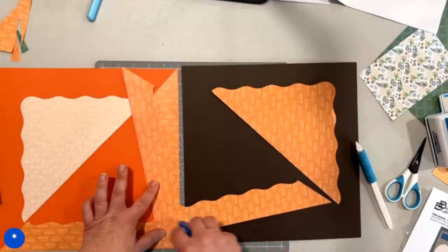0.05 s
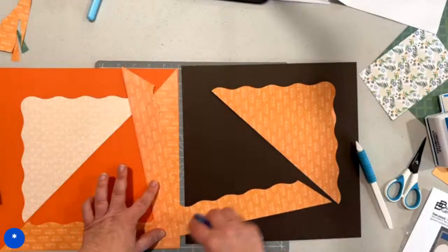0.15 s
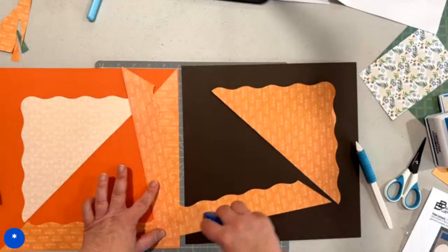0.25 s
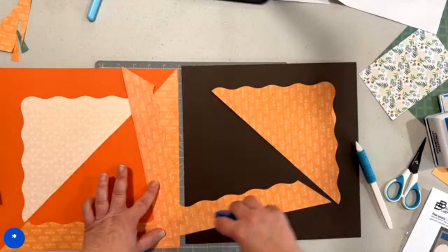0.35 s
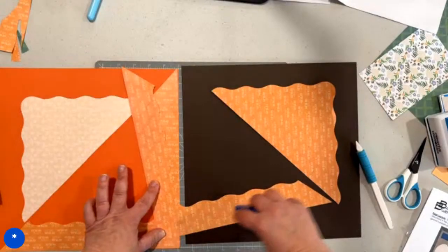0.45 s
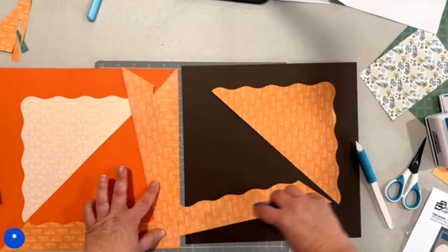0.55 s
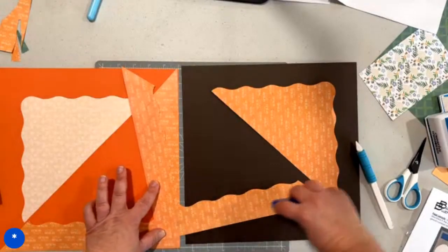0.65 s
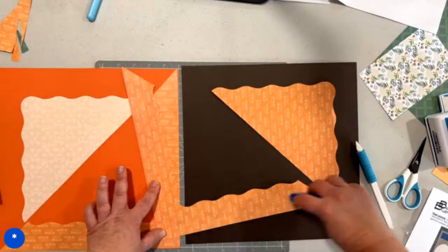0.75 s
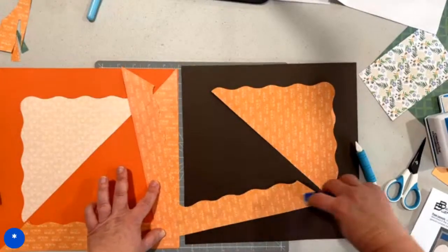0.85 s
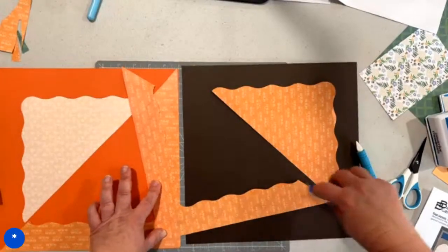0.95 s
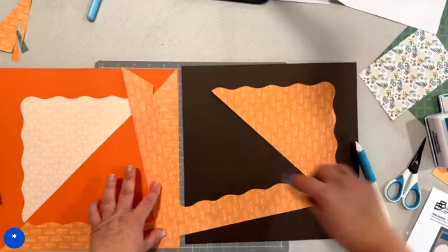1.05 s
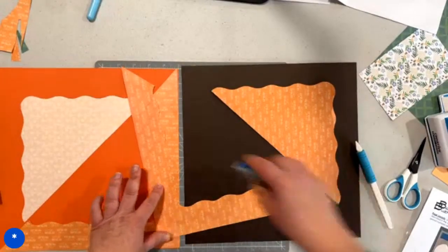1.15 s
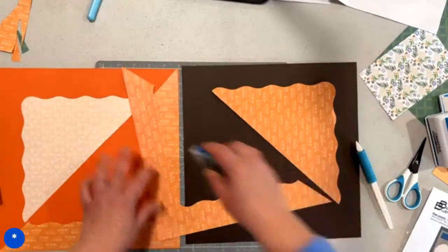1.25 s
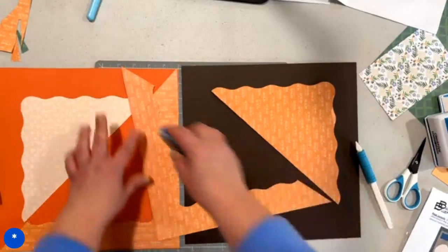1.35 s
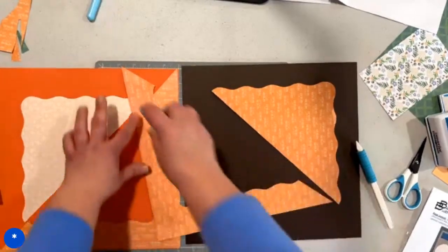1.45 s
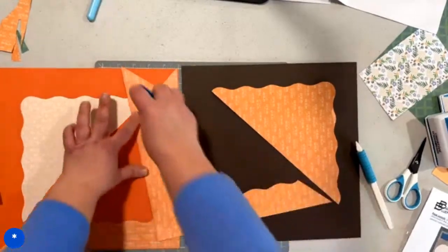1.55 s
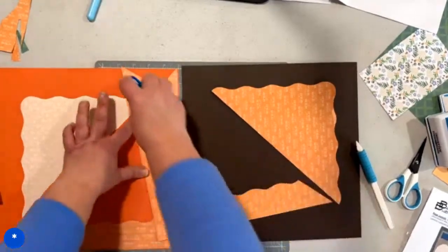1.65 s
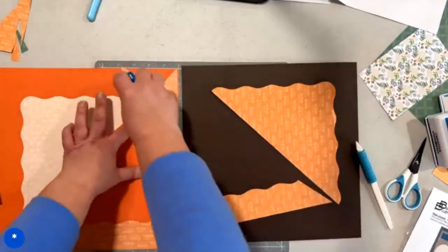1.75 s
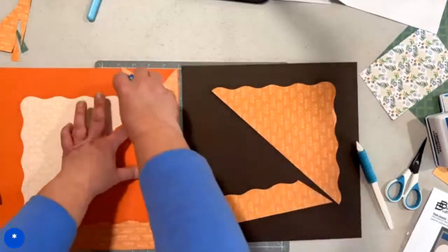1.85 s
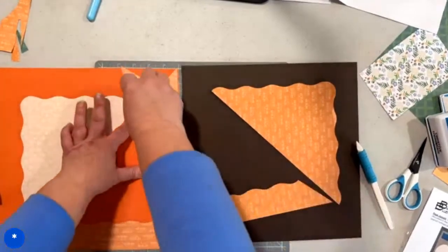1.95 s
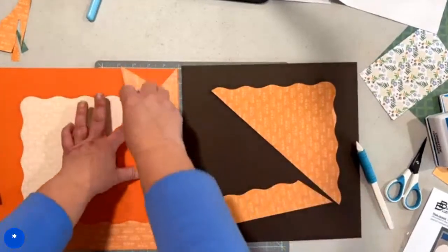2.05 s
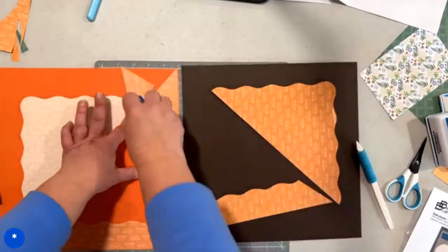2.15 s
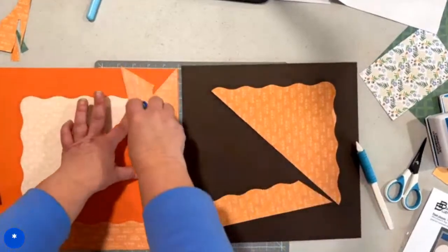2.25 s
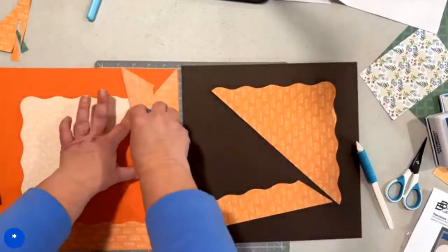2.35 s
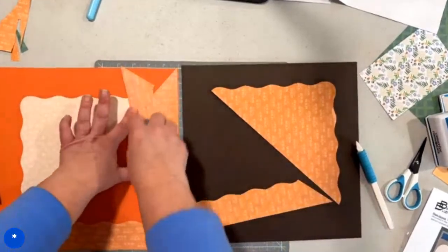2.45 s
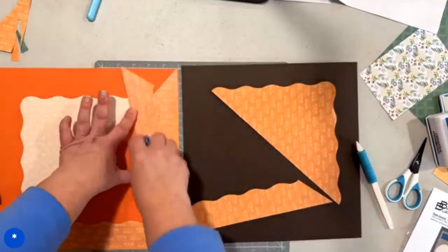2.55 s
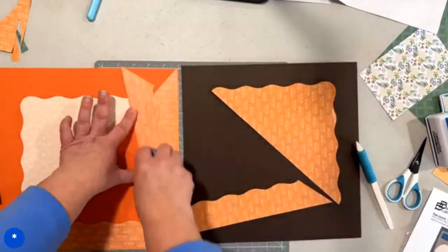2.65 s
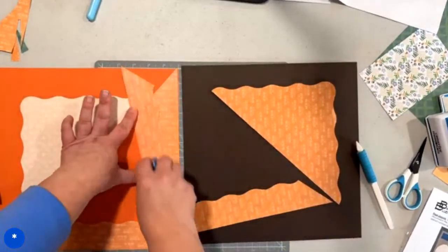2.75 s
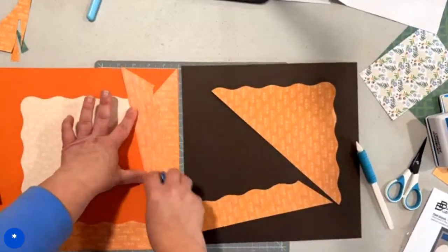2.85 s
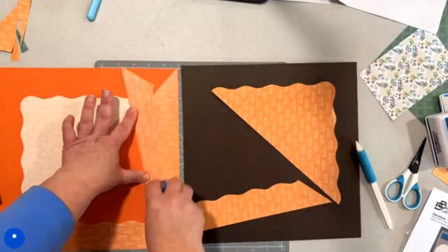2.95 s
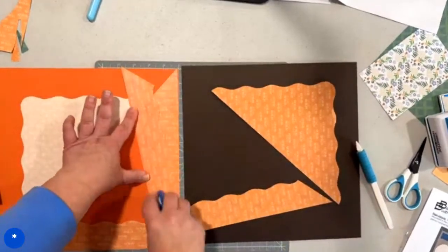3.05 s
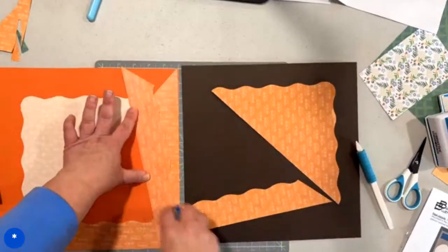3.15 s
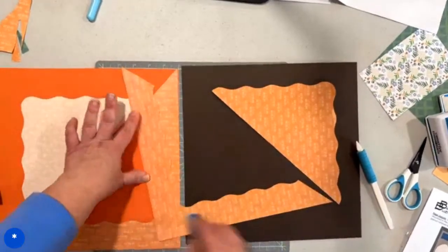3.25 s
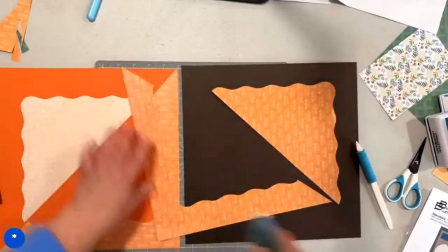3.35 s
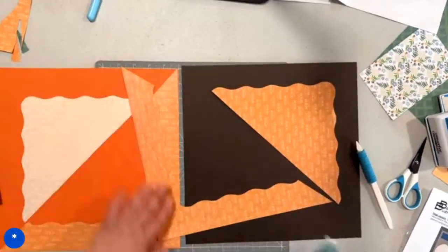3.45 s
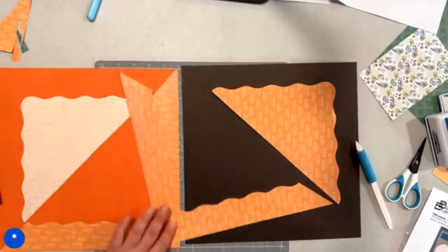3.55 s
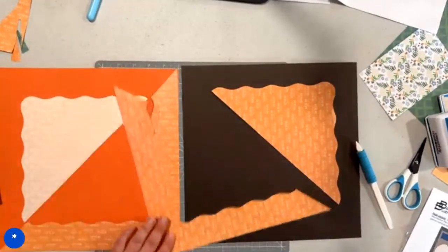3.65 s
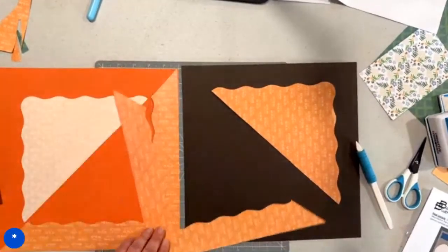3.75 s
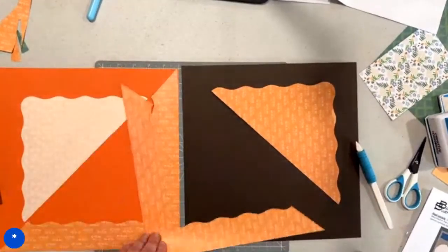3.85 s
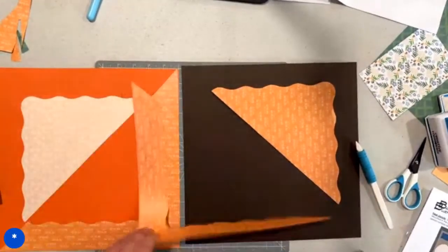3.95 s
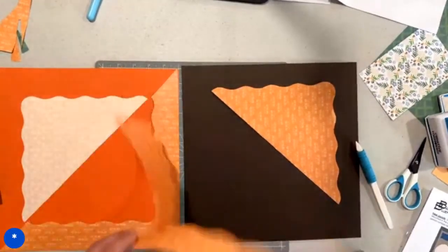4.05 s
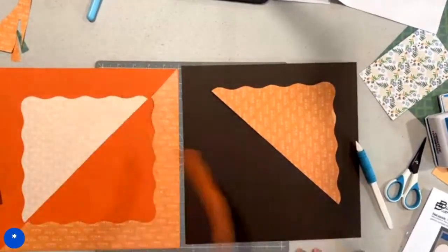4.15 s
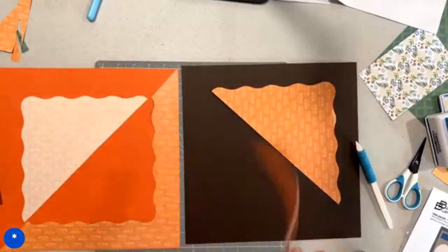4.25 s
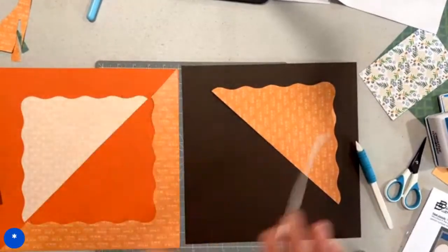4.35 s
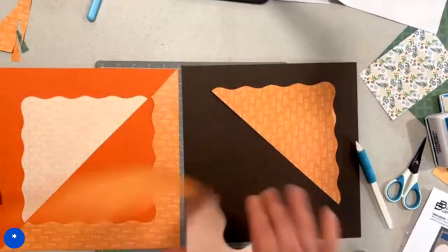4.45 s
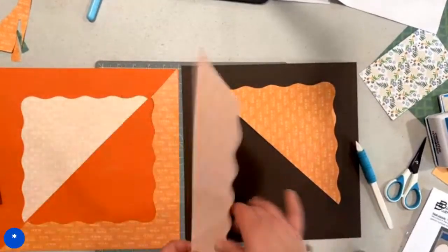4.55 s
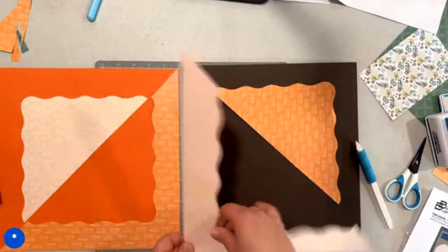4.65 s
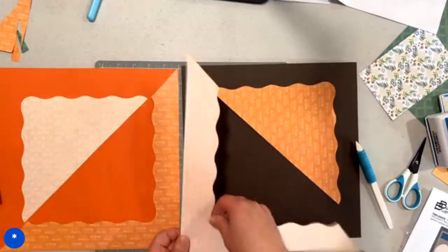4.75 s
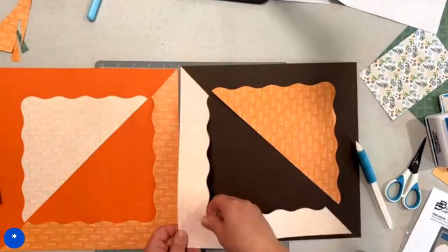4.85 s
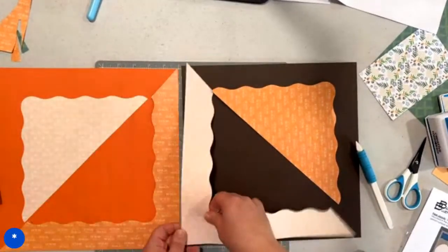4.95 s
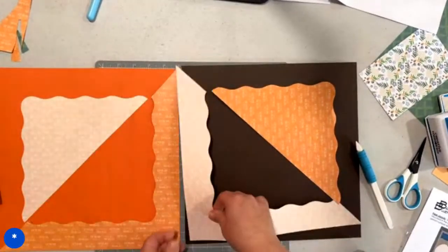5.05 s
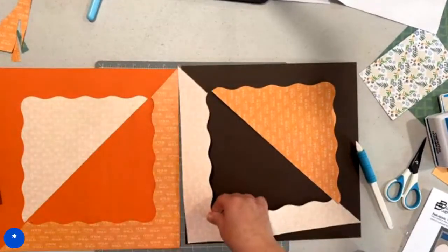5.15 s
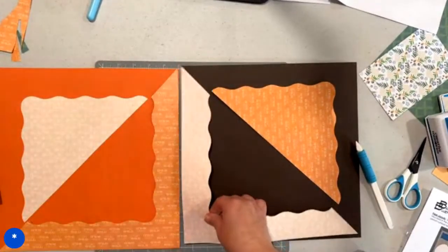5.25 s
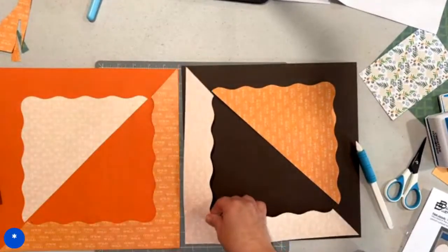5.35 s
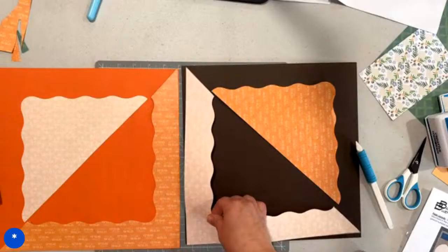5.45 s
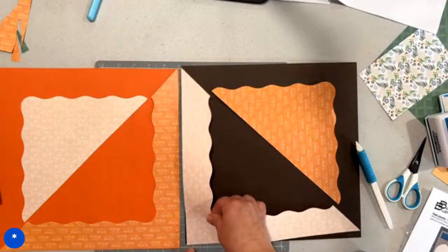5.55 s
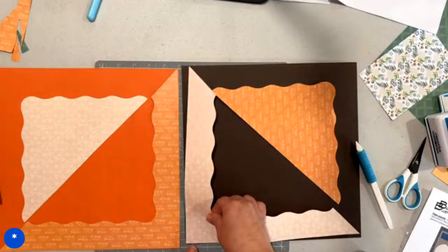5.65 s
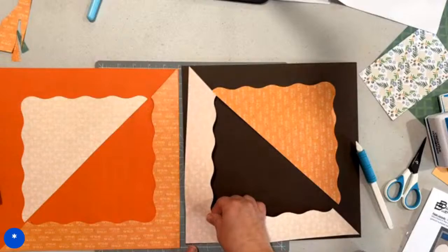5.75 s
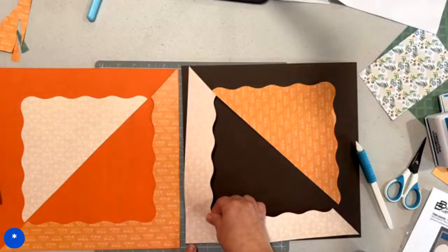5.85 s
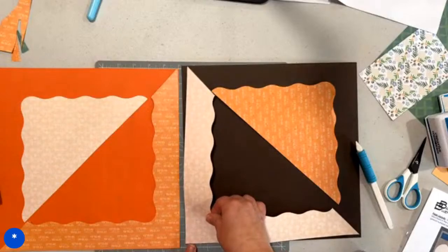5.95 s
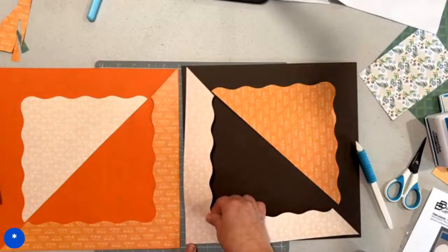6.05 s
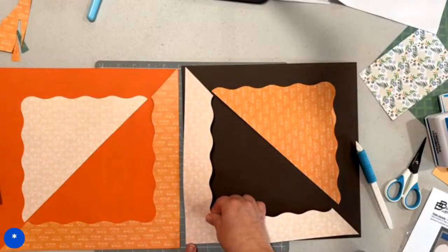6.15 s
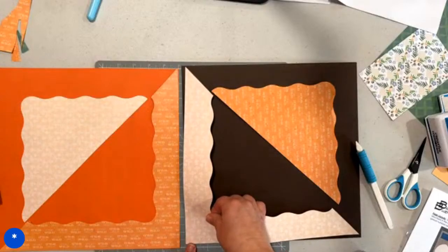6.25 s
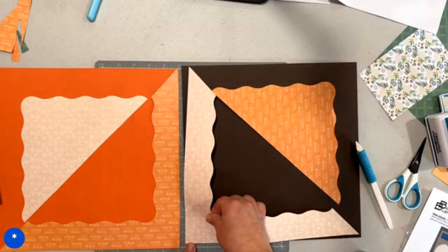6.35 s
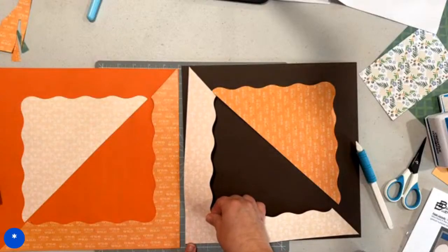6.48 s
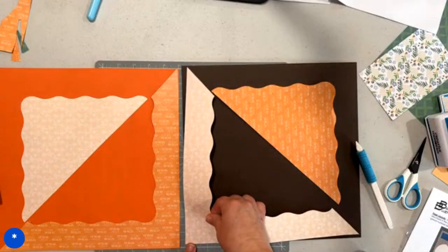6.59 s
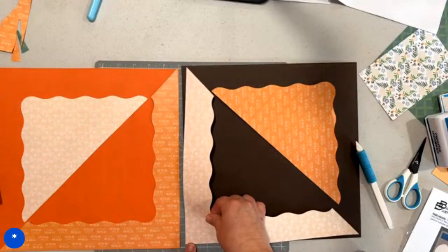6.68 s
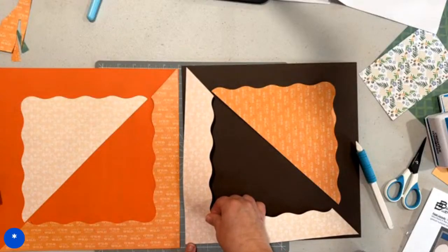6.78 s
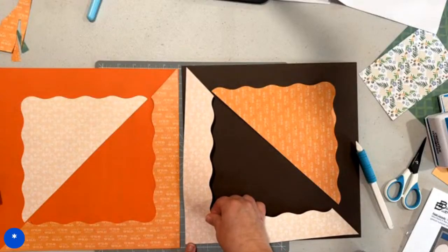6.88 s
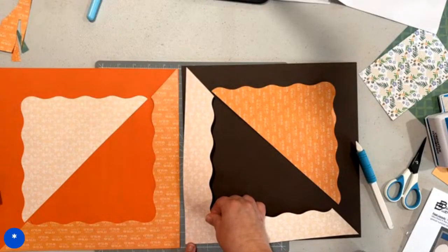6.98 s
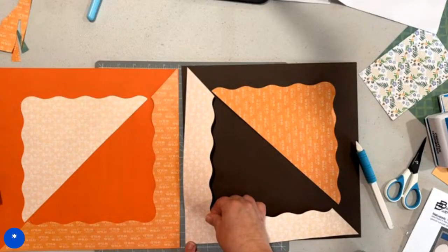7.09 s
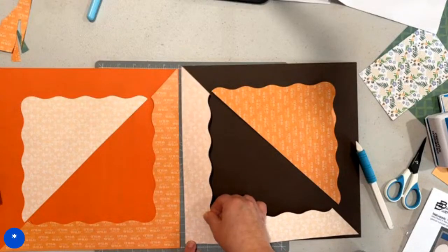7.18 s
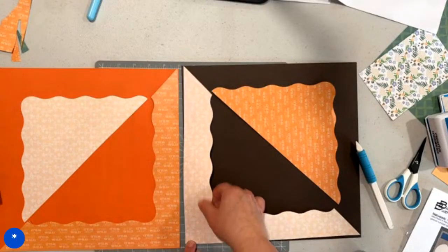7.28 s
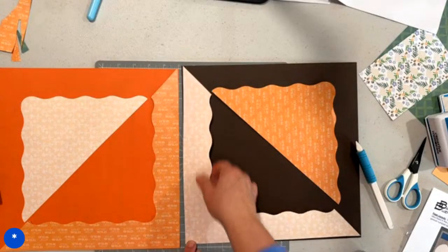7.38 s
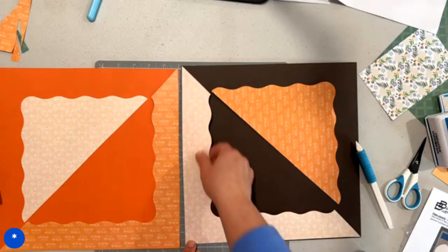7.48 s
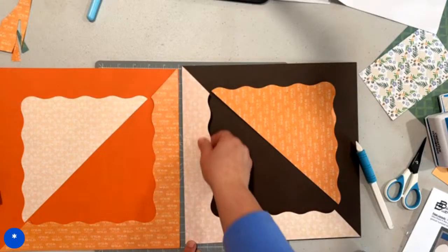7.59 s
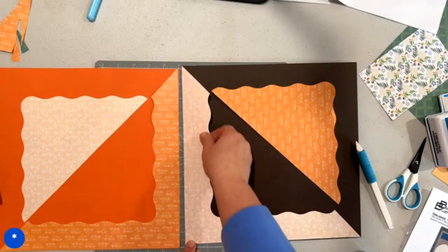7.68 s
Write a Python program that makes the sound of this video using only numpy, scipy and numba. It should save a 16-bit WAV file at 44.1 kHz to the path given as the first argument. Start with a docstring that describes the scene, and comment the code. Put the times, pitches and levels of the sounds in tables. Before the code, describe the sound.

Nine quick scratchy adhesive-roller strokes drum the table, paper is flipped with a crackling snap, then faint hand smoothing over a low mechanical chug.

```python
"""Close over a table, one microphone looking down. From 0 to 3.1 s a tape runner makes nine short strokes on paper:
the glue film peels with a hiss, the roller's slips ring the plastic case and the pressure drums the table.
From 3.5 s the strip is lifted and flipped: it rustles, flexes, flaps and snaps, all noise and resonances.
From 4.7 s it is smoothed by hand, as fingers slide over the paper in airy, whispering and dull bands of noise.
Throughout, a small motor chugs in the room by one knock a turn, over a low drone, room air and a short room tail."""
import sys
import numpy as np
from scipy import signal
from scipy.fft import rfft, irfft
from scipy.io import wavfile
from scipy.ndimage import uniform_filter1d
from numba import njit

SR = 44100
rng = np.random.default_rng(int(sys.argv[2]) if len(sys.argv) > 2 else 0)


def bounce(signal):
    """Save signal as a 16-bit WAV file at the path given by the first command-line argument."""
    frames = np.transpose(np.atleast_2d(signal))
    limited = np.clip(frames, -1, 1)
    pcm = np.round(limited * 32767).astype(np.int16)
    wavfile.write(sys.argv[1], SR, pcm)


N = 340538

# runner strokes: (roller touches t/s, film breaks free t/s, full speed t/s, roller lifts t/s,
#   stuck re full speed level/dB, peel hiss level/dB, case ring level/dB, case ring at the lift level/dB,
#   paper scrape level/dB, extra on the second and third case modes level/dB, extra on the lowest scrape band level/dB)
STROKES = [(-.08, -.06, 0.0, .064, -20, -36, -34, -51, -32, 10, 6.5),
           (.23, .26, .335, .387, -22, -33.5, -36, -35, -32, 5, 5),
           (.525, .538, .59, .66, -18, -32.5, -39, -43, -31, 8, 4),
           (.738, .752, .78, .852, -10, -34, -44, -43, -33, 6, 3),
           (1.78, 1.808, 1.86, 1.922, -12, -32.5, -40, -42, -43, 1, 5),
           (2.225, 2.235, 2.3, 2.355, -22, -34, -36, -35, -36, -2.5, 1),
           (2.51, 2.541, 2.6, 2.652, -15, -34.5, -31, -30, -34, -12, 6.5),
           (2.765, 2.788, 2.81, 2.873, -7, -35, -35, -36, -35, 3.5, 4.5),
           (3.018, 3.041, 3.08, 3.107, -8, -35, -25, -27, -35, -5.5, 4)]
# stroke envelopes: (extra while stuck level/dB, rise to full speed level/dB, attack dB/s, release dB/s,
#   tail re lift level/dB, tail decay dB/s)
PEEL_SHAPE = (-14, 9, 2000, 1200, -30, 72)
CASE_SHAPE = (-6, 9, 1200, 500, -22, 100)
SCRAPE_SHAPE = (-8, 12, 900, 700, -11, 125)
PEEL_SAG_DB, SCRAPE_SAG_DB = 2.5, 4  # lost between full speed and the lift


def runner():
    """The film peels while one train of roller slips excites paper, spool, case and table."""
    columns = np.transpose(STROKES)
    times = columns[:5]
    touch_s, free_s = columns[:2]
    peel_db, case_db, late_db, scrape_db, upper_db, edge_db = columns[5:]
    peel = stroked(times, peel_db, peel_db - PEEL_SAG_DB, PEEL_SHAPE)
    case = stroked(times, case_db, late_db, CASE_SHAPE)
    scrape = stroked(times, scrape_db, scrape_db - SCRAPE_SAG_DB, SCRAPE_SHAPE)
    stroke = latest(touch_s)
    slips = grit(spread_db=2.5) * undb(2. * walk(120))
    rolling = peel / (peel + 0.36 * scrape + 1e-9)  # near 1 while peel outweighs scrape
    return (peel * peeling_film(free_s[stroke])
            + scrape * paper_and_spool(slips, rolling, edge_db[stroke])
            + case * plastic_case(slips, upper_db[stroke])
            + pressed_table(slips))


# hiss of the peeling film: (f/Hz, level/dB per Hz)
PEEL = [(3530, -30), (6000, -7), (7680, -10.5), (8750, -1.5), (10000, 2), (11600, -4.5), (12600, -1),
        (14900, -3), (15200, 2), (15800, -6.5)]
JUDDER_HZ, JUDDER_S = 140, .025  # starting rate of the jerks, their fade time


def peeling_film(free_s):
    """Tearing glue hisses; the film first tears in separate jerks that quicken and fade."""
    since = np.maximum(np.arange(N) / SR - free_s, 0)
    jerk_phase = (JUDDER_HZ * since * (1 + 8 * since)) % 1
    jerk = np.exp(-jerk_phase / 0.14) - 0.15
    judder = undb(9 * np.exp(-since / JUDDER_S) * jerk * (since > 0))
    return judder * colour(grit(spread_db=6.0), PEEL) * undb(1.54 * walk(90))


# paper under the roller: (f/Hz, width/Hz, level/dB)
SCRAPE = [(2500, 1100, 3.5), (3950, 2300, 1.5)]
# spool inside the runner: (f/Hz, width/Hz, level/dB)
SPOOL = [(3206, 600, 2), (5170, 700, -8), (3730, 2100, -2.5), (2500, 250, -20)]


def paper_and_spool(slips, rolling, edge_db):
    """Slips ring the paper while the film peels; the spool rings on after it stops."""
    spool = 1.1 * (1 - 1.08 * rolling) * body(slips, SPOOL, patchy_db=2.5, drift=0.022)
    return rolling * body(slips, SCRAPE, [edge_db, 0], patchy_db=2.0, drift=0.028) + spool


# modes of the runner's case: (f/Hz, width/Hz, level/dB)
CASE = [(1158, 220, 4), (1395, 360, 1), (480, 450, -10)]


def plastic_case(slips, upper_db):
    """The plastic case resonates to the roller's slips."""
    return body(slips, CASE, [0, upper_db, upper_db], patchy_db=2., drift=0.039)


# the hand presses: (starts t/s, hardest t/s, lets go t/s, hardest level/dB, last level/dB,
#   extra on the deepest table mode level/dB, extra on the third to fifth modes level/dB)
GRIP = [(-.03, 0.005, .08, -33, -37, 4, 1), (.225, .25, .385, -30, -41, 2.5, 3),
        (.535, .582, .72, -28, -50, -3, 4), (.76, .83, .95, -33, -50, 13, -2.5),
        (1.73, 1.78, 1.795, -27, -30, 1, -1), (1.82, 1.91, 2.0, -39, -50, 0, .5),
        (2.178, 2.2, 2.4, -33, -46, 7.5, -1), (2.512, 2.535, 2.68, -24, -41, .5, -4),
        (2.767, 2.79, 2.9, -18, -38, -9, -7.5), (3.015, 3.03, 3.11, -20.5, -23, -10, -6)]
# table modes: (f/Hz, width/Hz, level/dB)
TABLE = [(69.6, 30, -7.5), (108.1, 23, 1), (146, 46, 3), (216.9, 46, -10), (306, 60, -27),
         (684, 100, -26.5)]
GRIP_RISE_DB, GRIP_ATTACK_DB_S, GRIP_RELEASE_DB_S = 12, 2000, 560


def pressed_table(slips):
    """Hand pressure couples the slips into the table, which drums."""
    *press, deep_db, high_db = np.transpose(GRIP)
    pressure = swell(*press, GRIP_RISE_DB, GRIP_ATTACK_DB_S, GRIP_RELEASE_DB_S)
    grip = latest(press[0])
    deep, high = deep_db[grip], high_db[grip]
    drum = body(slips, TABLE, [deep, 0, high, high, high, 0], drift=0.037)
    return pressure * steady(drum, span_s=.018)


HAND_RISE_DB, HAND_ATTACK_DB_S, HAND_RELEASE_DB_S = 8, 1800, 700


def hands():
    """The lifted strip and the sliding fingers; all but the hisses share one uneven crinkle."""
    crinkle = grit(spread_db=3.0) * undb(2.3 * walk(90))
    return rustling_strip() + flexing_strip(crinkle) + flapping_strip(crinkle) + sliding_fingers(crinkle)


def handled(rows):
    """Gain of the strip's gestures, from the first five columns of their table."""
    return swell(*np.transpose(rows)[:5], HAND_RISE_DB, HAND_ATTACK_DB_S, HAND_RELEASE_DB_S)


# the strip rustles: (starts t/s, loudest t/s, stops t/s, loudest level/dB, last level/dB)
RUSTLES = [(3.5, 3.565, 3.69, -49, -57), (3.7, 3.75, 3.765, -56, -54), (3.768, 3.773, 3.85, -44, -69),
           (3.867, 3.877, 3.9, -40, -50), (3.9, 4.04, 4.08, -44.5, -46), (4.14, 4.144, 4.17, -56, -66),
           (4.21, 4.255, 4.27, -56, -53), (4.272, 4.278, 4.335, -47, -66), (4.462, 4.47, 4.51, -68, -74)]
# hiss of the rustle: (f/Hz, level/dB per Hz)
RUSTLE = [(2000, -19), (3500, -10), (4800, -18), (7800, -16), (9300, -5), (15800, -14)]


def rustling_strip():
    """Many small slips of the strip blend into an uneven hiss."""
    return handled(RUSTLES) * colour(grit(spread_db=6.0), RUSTLE) * undb(1.8 * walk(42))


# the strip buckles and flexes: (starts t/s, loudest t/s, stops t/s, loudest level/dB, last level/dB)
FLEXES = [(3.558, 3.575, 3.67, -34, -40), (3.68, 3.7, 3.8, -56, -64), (3.866, 3.878, 4.09, -31, -50),
          (4.1, 4.17, 4.3, -62, -67)]
# modes of the buckling strip: (f/Hz, width/Hz, level/dB)
FLEX = [(610, 180, 0), (1020, 230, 5), (1570, 310, 1.5), (1980, 190, -9.5), (1940, 1240, -3),
        (3380, 270, -10)]


def flexing_strip(crinkle):
    """Crinkling excites the midrange modes of the buckling strip."""
    return handled(FLEXES) * body(crinkle, FLEX, patchy_db=3.5, drift=0.024)


# the strip flaps: (starts t/s, loudest t/s, stops t/s, loudest level/dB, last level/dB,
#   extra on the lowest mode level/dB)
FLAPS = [(3.572, 3.605, 3.655, -23, -28, -3), (3.7, 3.75, 3.84, -50, -51, -3),
         (3.878, 3.895, 4.04, -21, -32, 7), (4.055, 4.07, 4.088, -30, -33, 2),
         (4.1, 4.15, 4.32, -40.5, -50, 2)]
# low modes of the flapping strip: (f/Hz, width/Hz, level/dB)
FLAP = [(96.6, 33, -1), (160, 27, 3.5), (210.3, 52, -4), (323.6, 67, -10)]


def flapping_strip(crinkle):
    """Crinkling drives the strip's low modes into an evened-out flutter."""
    columns = np.transpose(FLAPS)
    deep = columns[5][latest(columns[0])]
    flutter = body(crinkle, FLAP, [deep, 0, 0, 0], patchy_db=3.0, drift=0.022)
    return handled(FLAPS) * steady(flutter, span_s=.018)


# fingers slide on the paper: (starts t/s, loudest t/s, stops t/s, airy rustle level/dB,
#   narrow whisper level/dB, dull scuff level/dB)
SLIDES = [(4.72, 4.8, 4.85, -73, -78, -66), (4.864, 4.875, 4.9, -59, -68, -66),
          (4.91, 4.96, 5.0, -56.5, -64, -64), (5.017, 5.025, 5.045, -62, -74, -62),
          (5.08, 5.245, 5.26, -74, -76, -73), (5.3, 5.33, 5.42, -80, -77, -80),
          (5.47, 5.54, 5.57, -70, -76, -79), (5.58, 5.605, 5.625, -66, -70, -79),
          (5.91, 5.94, 5.97, -86, -79, -90), (6.06, 6.085, 6.11, -86, -80, -90),
          (6.27, 6.292, 6.33, -77, -78, -83), (6.5, 6.55, 6.58, -77, -81, -85),
          (7.11, 7.15, 7.2, -71, -68, -68), (7.2, 7.27, 7.32, -63.5, -66, -66),
          (7.3, 7.36, 7.47, -60, -69, -72), (7.48, 7.53, 7.63, -65, -73, -80)]
# airy rustle of fingers on paper: (f/Hz, level/dB per Hz)
SHEEN = [(6000, -25), (7800, -12.5), (9400, -1.5), (10800, -3.5), (13000, -5.5), (15800, -7.5)]
SLIDE_RISE_DB, SLIDE_SAG_DB, SLIDE_ATTACK_DB_S, SLIDE_RELEASE_DB_S = 6, 6, 350, 250


def sliding_fingers(crinkle):
    """Skin rubs the paper in an airy rustle, a narrow whisper and a dull scuff."""
    columns = np.transpose(SLIDES)
    slide, whisper, scuff = (
        swell(*columns[:3], db, db - SLIDE_SAG_DB, SLIDE_RISE_DB, SLIDE_ATTACK_DB_S, SLIDE_RELEASE_DB_S)
        for db in columns[3:])
    airy = colour(grit(spread_db=1.5), SHEEN) * undb(2.1 * walk(40))
    narrow = body(crinkle, [(6690, 1400, 0.5)], patchy_db=2.5, drift=0.0084)
    # scuff bands: (f/Hz, width/Hz, level/dB)
    dull_modes = [(3580, 300, -4), (2680, 500, -4), (4870, 600, -11), (3750, 2100, 0.5)]
    dull = body(crinkle, dull_modes, patchy_db=3.5, drift=0.045)
    return slide * airy + whisper * narrow + scuff * dull


# short snaps, knocks and ticks: runner touching down or film breaking free, strip snapping, fingers ticking:
#   (starts t/s, level/dB, ring f/Hz, t60 of the noisy ring t/s)
CONTACTS = [(1.0, -58, 3250, .1), (1.0194, -53, 2340, .08), (1.663, -54, 3220, 0.3),
            (1.726, -46, 1310, 0.096), (1.811, -40, 9000, .05), (2.239, -34, 9150, 0.029),
            (2.51, -41.5, 1170, 0.038), (2.5414, -38, 9450, 0.046), (2.767, -37, 1210, 0.032),
            (3.022, -32.5, 1180, 0.11), (3.5593, -28.5, 2120, .07), (3.77, -46.5, 3340, 0.14),
            (3.8735, -30, 1383, 0.22), (3.924, -23, 1000, 0.11), (3.9942, -15.5, 1510, 0.067),
            (3.996, -24, 940, 0.051), (3.56, -36, 3100, .1), (4.008, -32, 3460, 0.14),
            (4.142, -37, 9340, 0.029), (4.15, -51.5, 2180, .08), (4.219, -50.5, 3560, .08),
            (4.2764, -39, 2436, 0.13), (4.4637, -63, 7000, 0.093), (4.868, -50.5, 4300, 0.27),
            (5.022, -48, 2820, 0.28), (5.026, -56, 1800, 0.2), (5.5417, -54.5, 1840, 0.089),
            (7.0926, -57, 2580, 0.069)]


def contacts():
    """Each snap, knock or tick is a broad crack into a noisy ring and a faster-fading pure one."""
    out, t = np.zeros(N + SR), np.arange(SR // 2) / SR
    for s, db, hz, t60 in CONTACTS:
        noise = rng.standard_normal(len(t))
        rough = unit(ring(noise, hz, 0.14 * hz)) * undb(-60 * t / max(t60, .01))
        clean = 1.08 * np.sin(2 * np.pi * hz * t) * undb(-60 * t / max(0.49 * t60, .01))
        crack = 0.083 * noise * undb(-60 * t / 0.01)
        out[int(s * SR):][:len(t)] += undb(db) * (.5 * rough + clean + crack)
    return out[:N]


# fingertips bump the table: (starts t/s, level/dB, ring f/Hz)
BUMPS = [(3.7, -46.5, 325), (3.85, -41, 350), (5.25, -49, 173), (7.1, -48.5, 286)]


def bumps():
    """A soft fingertip gives the table a rounded attack and a low, noisy ring."""
    out, t = np.zeros(N + SR), np.arange(SR // 2) / SR
    for s, db, hz in BUMPS:
        noise = rng.standard_normal(len(t))
        thud = unit(ring(ring(noise, hz, .4 * hz), hz, .4 * hz))
        out[int(s * SR):][:len(t)] += undb(db) * thud * undb(-60 * t / 0.27) * (1 - np.exp(-t / 0.0021))
    return out[:N]


# motor speed: (t/s, turns per s)
MOTOR = [(0, 26.52), (4.4, 26.517), (5.4, 26.505), (7.72, 26.505)]
# housing modes, rung once a turn: (f/Hz, width/Hz, level/dB, lag t/s)
HOUSING = [(53, 20, -18.5, .01), (140, 50, -11.5, 0.0038), (212, 55, 1, .008), (435, 50, 2, .003),
           (510, 37, -4, .004), (758, 73, -4, 0.000056), (936, 89, -6.5, 0.0027), (1200, 200, -13, 0.0098),
           (1650, 200, -12.5, 0.), (2110, 300, -13, 0.0033), (2700, 500, -21, 0.0084)]
# loose panel: (f/Hz, width/Hz, level/dB, lag t/s)
PANEL = (636, 66, -4.5, 1.14)
# the panel briefly buzzes louder: (t/s, extra level/dB)
BUZZES = [(3.22, 17.5), (4.54, 12.5), (4.91, 11), (5.25, 5.5), (5.6, 6.5), (6.52, 11), (7.34, 9)]
MOTOR_START = .98  # share of a turn done at 0 s
MOTOR_DB, DRONE_HZ, DRONE_DB = -59, 90.7, -66


def motor():
    """A knock per turn rings housing and panel, and loose parts tick in between; a low drone throbs beneath."""
    t = np.arange(N) / SR
    turn = MOTOR_START + np.cumsum(np.interp(t, *np.transpose(MOTOR))) / SR
    beats = np.flatnonzero(np.diff(np.floor(turn)))
    rub = 0.017 * rng.standard_normal(N) * np.exp(-(turn % 1) / 0.45)
    ticks = .15 * rng.standard_normal(N) * (rng.random(N) < 60 / SR)  # about 60 a second
    rattle = rub + ticks
    housing = sum(knocked_mode(beats, rattle, *mode) for mode in HOUSING)
    buzz_db = sum(db * np.exp(-((t - s) / .05) ** 2) for s, db in BUZZES)
    chug = housing + undb(buzz_db) * knocked_mode(beats, rattle, *PANEL)
    drone_hz = DRONE_HZ * (1 + .003 * walk(4.6))
    drone = np.sin(2 * np.pi * np.cumsum(drone_hz) / SR) * undb(1.24 * walk(3.3))
    return undb(MOTOR_DB) * unit(chug) + undb(DRONE_DB) * unit(drone)


def knocked_mode(beats, rattle, hz, width_hz, db, lag_s):
    """One mode rung by knocks and rattle; higher modes answer each knock less evenly."""
    knock = np.zeros(N)
    knock[beats] = undb(0.89 * np.log(hz / 100) * rng.standard_normal(len(beats)))
    drive = knock + rattle * min(hz / 1500, 1)
    rung = unit(ring(ring(drive, hz, width_hz), hz, width_hz))
    return undb(db) * np.roll(rung, int(lag_s * SR))


# room air: (f/Hz, level/dB per Hz)
AIR = [(25, -18.5), (60, -14.5), (200, -7), (300, -21.5), (450, -13), (900, -14), (2000, -24.5),
       (3250, -37.5), (6500, -42.5), (8000, -45), (9500, -37), (16000, -38.5)]
AIR_DB = -62


def room_air():
    """The room's steady noise, its level wandering a little."""
    level = undb(AIR_DB + 0.69 * walk(1.4) + 0.82 * walk(25))
    return level * colour(rng.standard_normal(N), AIR)


def undb(db):
    """Gain of a level in dB."""
    return 10 ** (np.asarray(db) / 20)


def unit(x):
    """Scaled to rms 1."""
    return x / np.sqrt(np.mean(x ** 2))


def ring(x, hz, width_hz):
    """One resonance, gain 1 at its centre."""
    return signal.lfilter(*signal.iirpeak(min(hz, .45 * SR), hz / width_hz, fs=SR), x)


@njit
def svf(x, hz, width_hz):
    """State-variable band-pass whose centre may move; gain 1 at the centre."""
    y, b, l = np.empty(len(x)), 0., 0.
    for i in range(len(x)):
        g, k = np.tan(np.pi * hz[i] / SR), width_hz / hz[i]
        v = (b + g * (x[i] - l)) / (1 + g * (g + k))
        b, l, y[i] = 2 * v - b, l + 2 * g * v, k * v
    return y


def body(x, modes, extra_db=None, patchy_db=0., drift=0.):
    """Sum of steep resonances, whose level and pitch can wander as the contact moves."""
    extra_db = extra_db or [0.] * len(modes)
    out = 0
    for (hz, width_hz, db), extra in zip(modes, extra_db):
        centre = np.minimum(hz * (1 + drift * walk(8)), .45 * SR)
        mode = unit(svf(svf(x, centre, 1. * width_hz), centre, 1. * width_hz))
        out = out + undb(db + extra + patchy_db * walk(30)) * mode
    return out / np.sqrt(np.sum(undb(np.transpose(modes)[2]) ** 2))


def colour(x, spectrum):
    """Filter to a (f/Hz, level/dB) spectrum, rms 1."""
    hz, db = np.transpose(spectrum)
    bins = np.arange(1, N // 2 + 2) * SR / N
    return unit(irfft(rfft(x) * undb(np.interp(np.log(bins), np.log(hz), db)), N))


def grit(spread_db):
    """Dense slips of unequal size, the largest boost capped."""
    return rng.standard_normal(N) * undb(spread_db * np.minimum(rng.exponential(size=N), 4))


def walk(rate):
    """Random levels drawn every 1 / rate s and slewed, trimmed to length, then scaled to rms 1."""
    k = int(SR / rate)
    return unit(uniform_filter1d(np.repeat(rng.standard_normal(N // k + 1), k), k)[:N])


def swell(start_s, peak_s, stop_s, peak_db, last_db, rise_db, attack_db_s, release_db_s):
    """Gain of many gestures: a quick attack, a rise to the peak, a slope to the last level, a release."""
    t, out = np.arange(0, N + 32, 32) / SR, -200
    for a, b, c, top, last in zip(start_s, peak_s, stop_s, peak_db, last_db):
        db = np.interp(t, [a, max(a, b), max(a, b, c)], [top - rise_db, top, last])
        out = np.maximum(out, db - attack_db_s * np.maximum(a - t, 0) - release_db_s * np.maximum(t - c, 0))
    return np.interp(np.arange(N) / SR, t, undb(out))


def latest(start_s):
    """Index of the event under way at each sample, switching 20 ms before its start."""
    return np.searchsorted(start_s[1:], np.arange(N) / SR + .02)


def stroked(times, fast_db, lift_db, shape):
    """Gain of one layer of every stroke: faint from the touch, rising once free, a fading tail after the lift."""
    touch_s, free_s, fast_s, lift_s, stuck_db = times
    extra_db, rise_db, attack_db_s, release_db_s, tail_db, tail_db_s = shape
    faint, after = fast_db + stuck_db + extra_db, lift_db + tail_db
    stuck = swell(touch_s, touch_s, free_s, faint, faint, 0, attack_db_s, release_db_s)
    free = swell(free_s, fast_s, lift_s, fast_db, lift_db, rise_db, attack_db_s, release_db_s)
    tail = swell(lift_s, lift_s, lift_s, after, after, 0, attack_db_s, tail_db_s)
    return np.maximum(stuck, free) + tail


def steady(x, span_s):
    """A body driven without a break: swells longer than span_s are evened out."""
    span = int(span_s * SR)
    power = uniform_filter1d(uniform_filter1d(x ** 2, span), span)
    return unit(x / np.sqrt(power + 1e-9))


ROOM_T60_S, ROOM_DB = 0.27, -16.5


def scene():
    """Runner and hands close by with a short room tail, over motor and room air."""
    near = runner() + hands() + contacts() + bumps()
    t = np.arange(SR // 2) / SR
    tail = rng.standard_normal(len(t)) * undb(-60 * t / ROOM_T60_S) * (t > .006)
    wet = signal.fftconvolve(near, tail / np.sqrt(np.sum(tail ** 2)))[:N]
    return (near + undb(ROOM_DB) * wet + motor() + room_air())[None]


TOP_HZ = 15800


def record(dry):
    """The microphone loses the deepest bass; the recorder cuts the top."""
    capsule = signal.sosfilt(signal.butter(2, 32, "high", fs=SR, output="sos"), dry)
    return signal.sosfilt(signal.ellip(10, .2, 60, TOP_HZ, fs=SR, output="sos"), capsule)


dry = scene()
out = record(dry)
bounce(out)
```